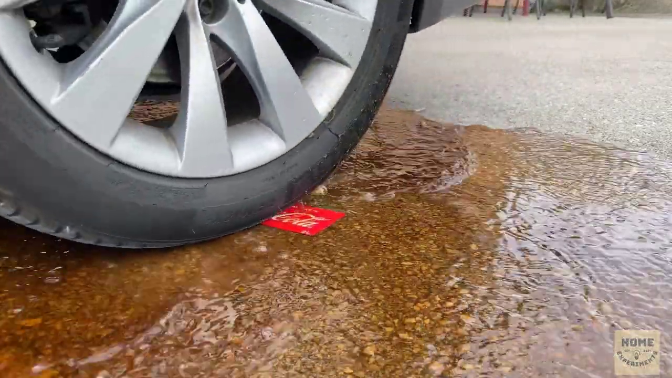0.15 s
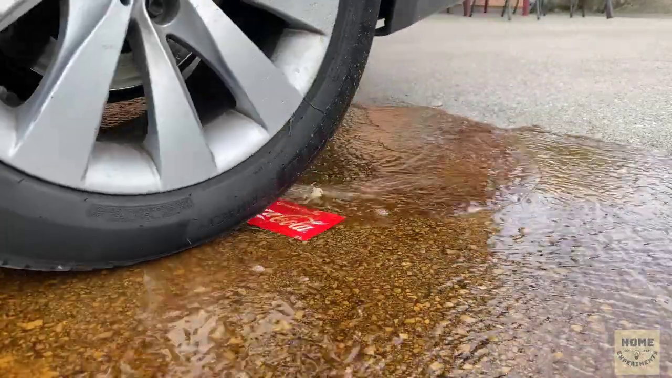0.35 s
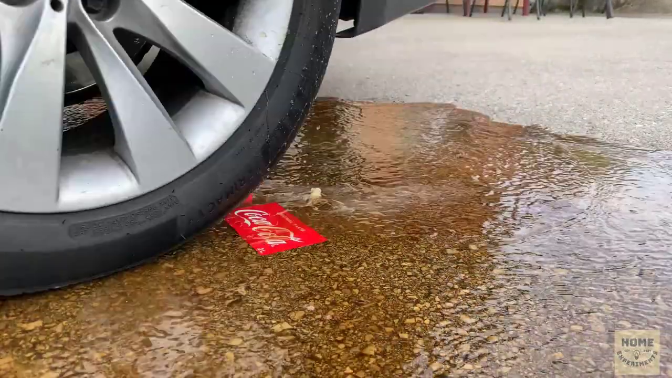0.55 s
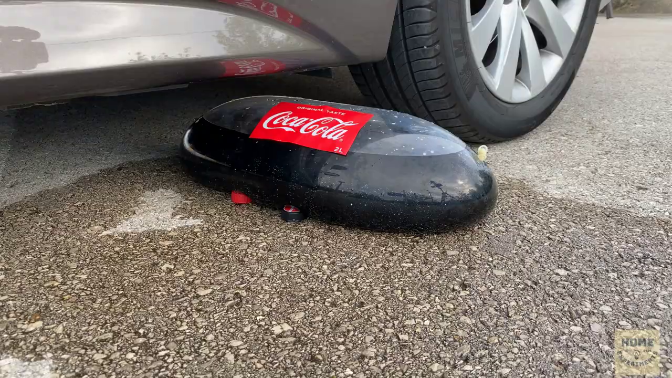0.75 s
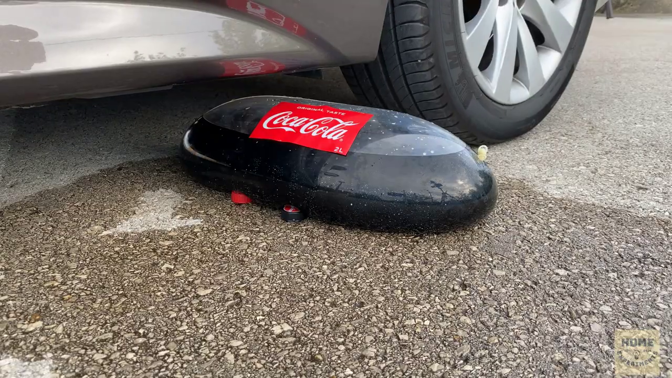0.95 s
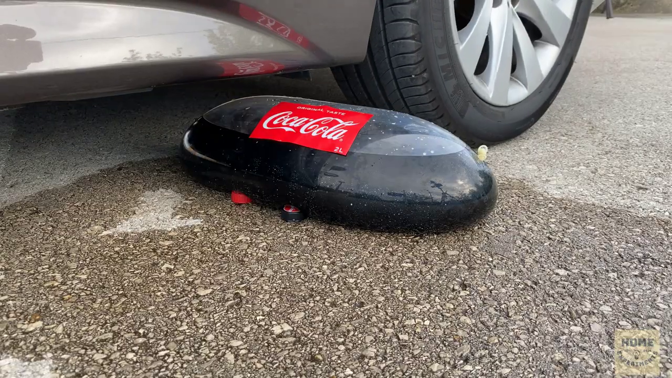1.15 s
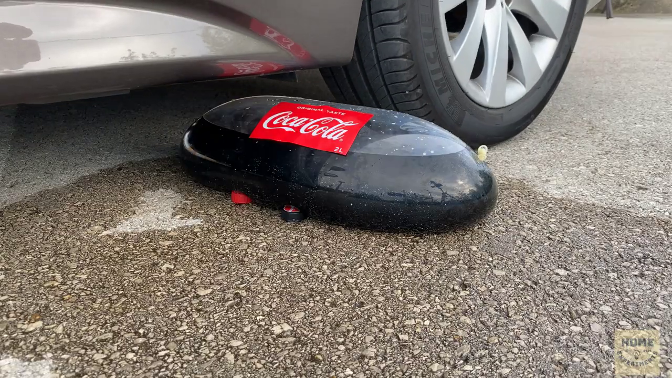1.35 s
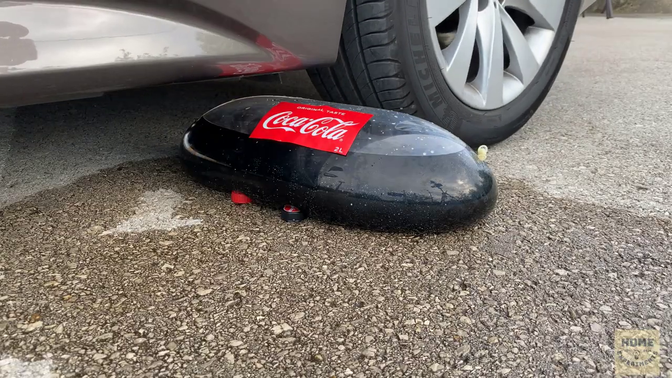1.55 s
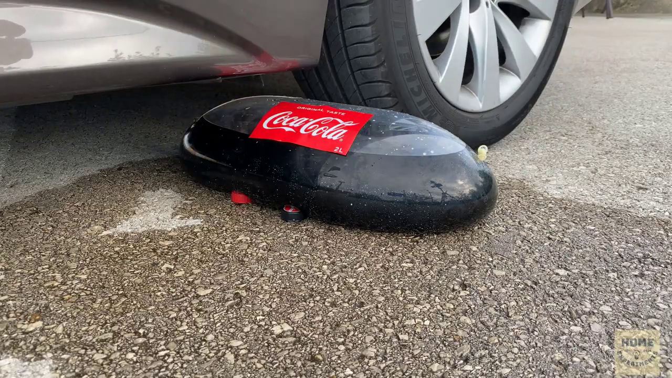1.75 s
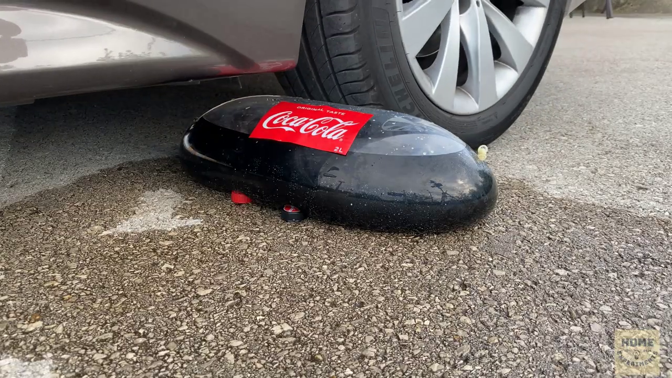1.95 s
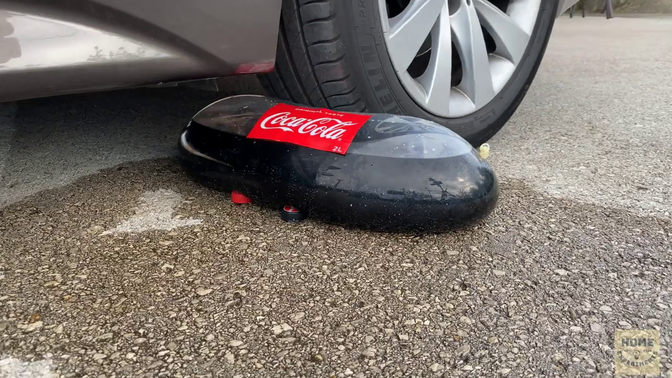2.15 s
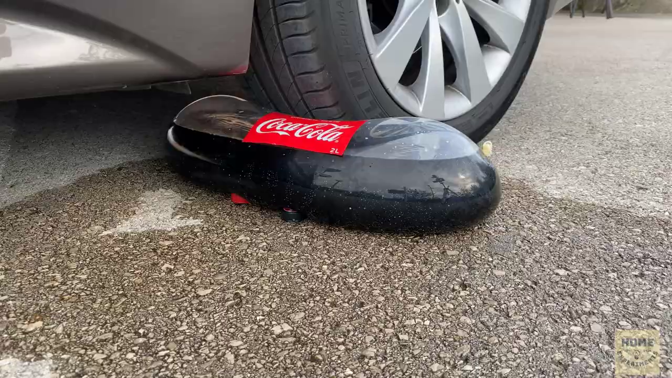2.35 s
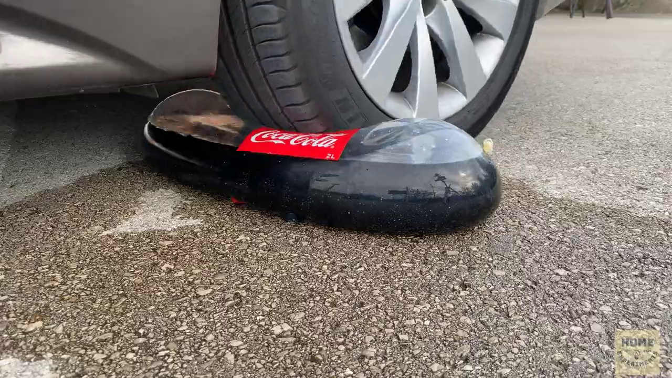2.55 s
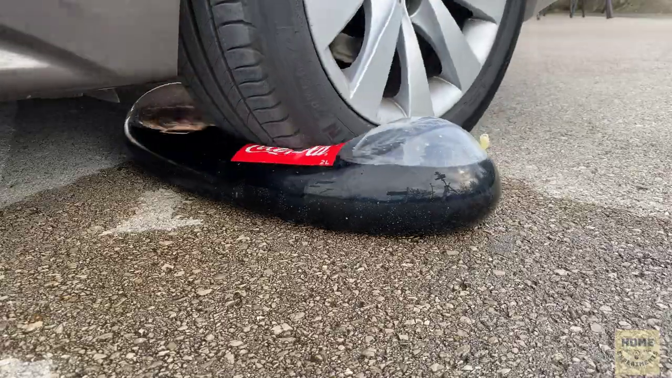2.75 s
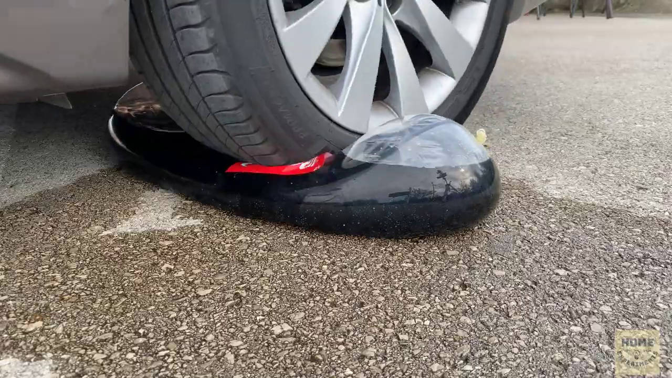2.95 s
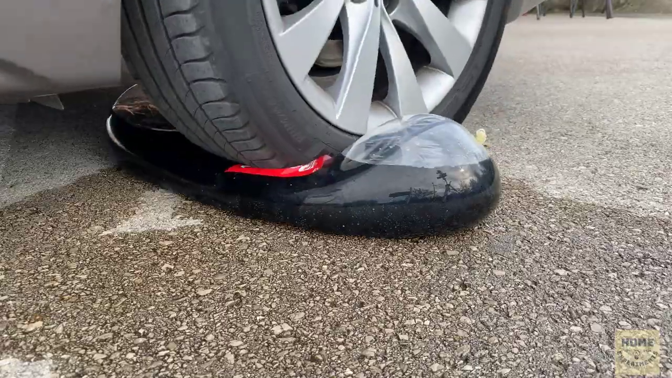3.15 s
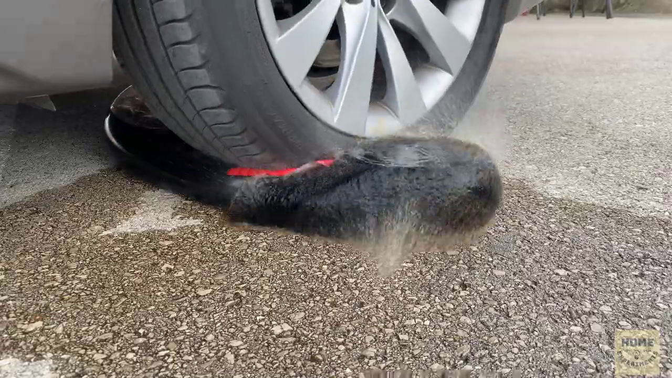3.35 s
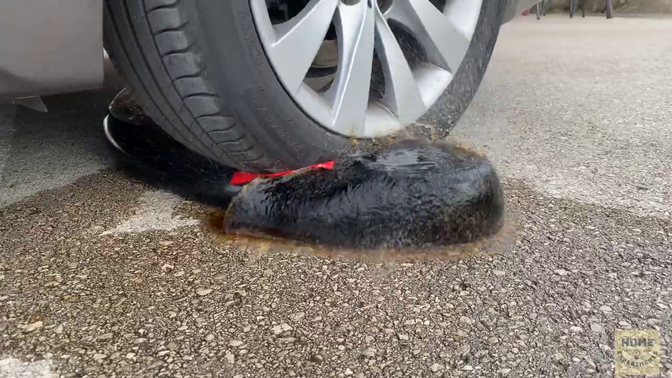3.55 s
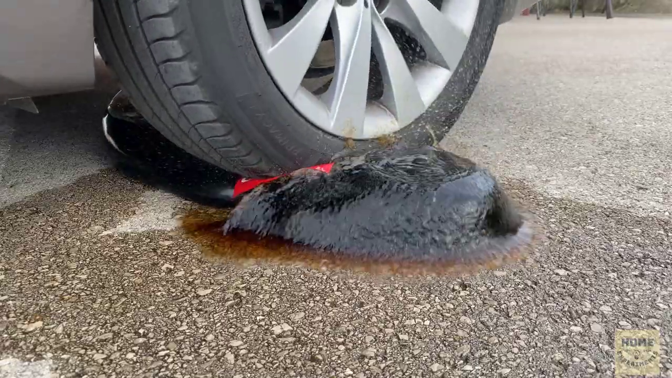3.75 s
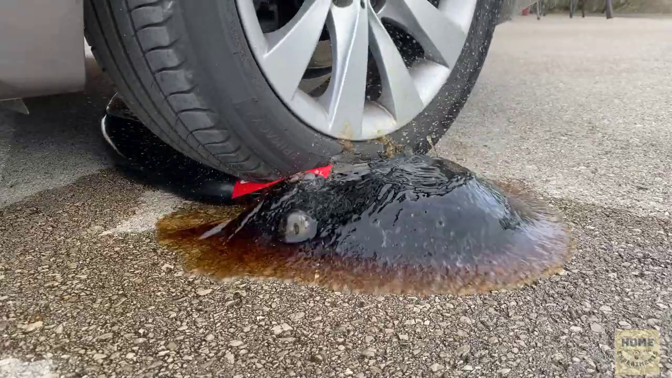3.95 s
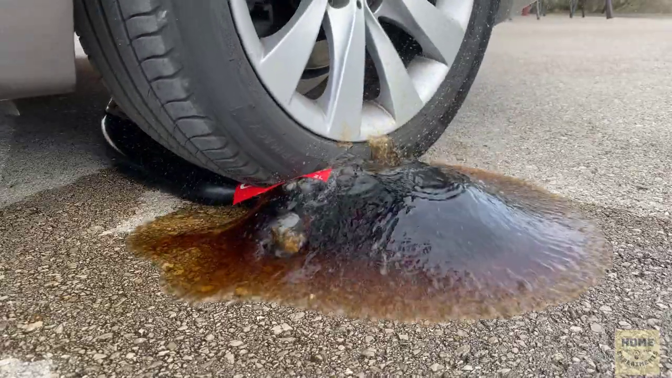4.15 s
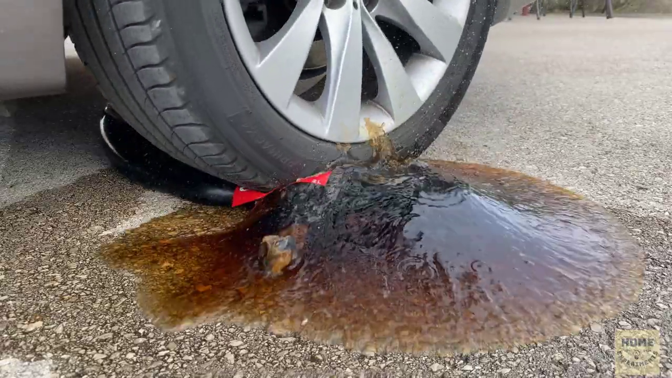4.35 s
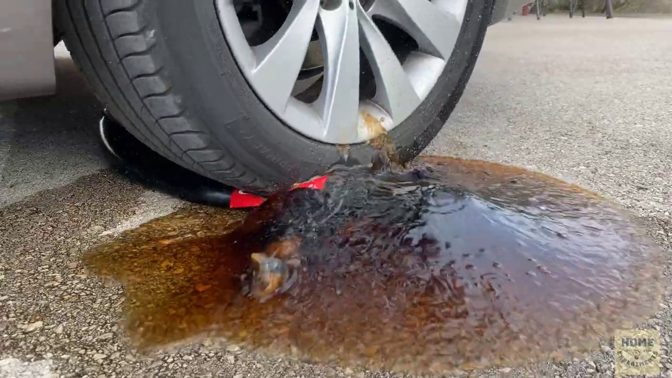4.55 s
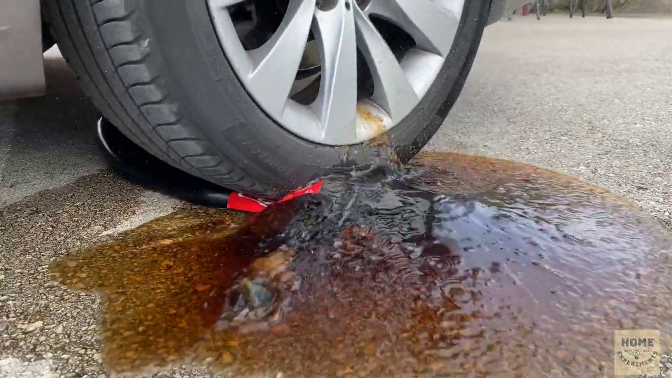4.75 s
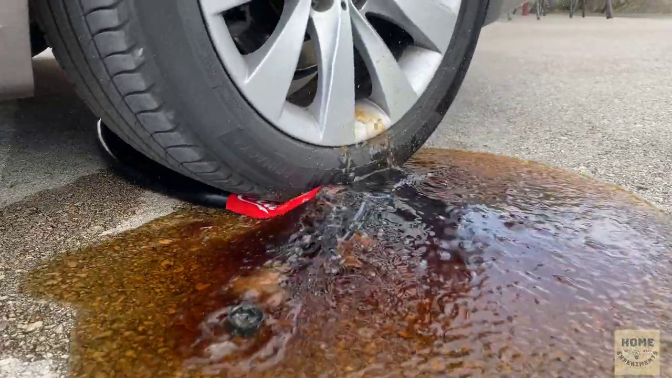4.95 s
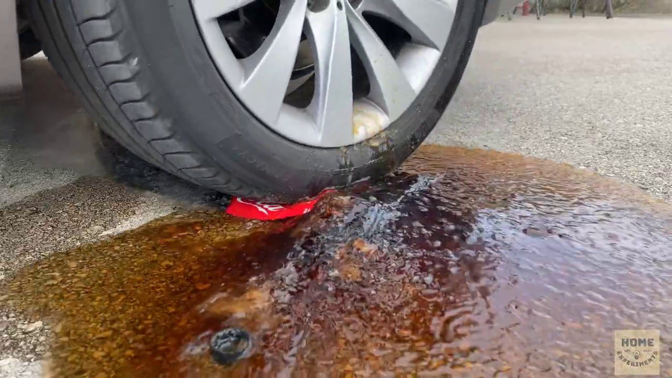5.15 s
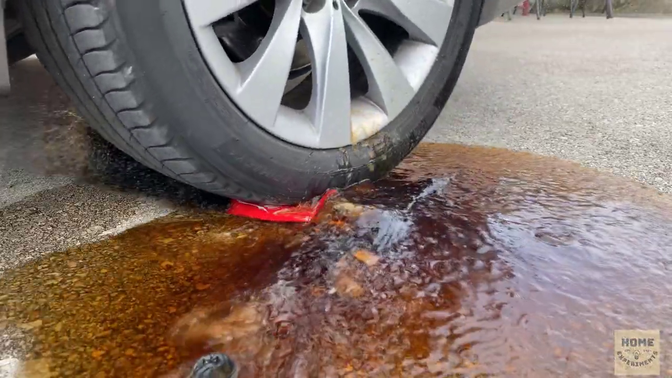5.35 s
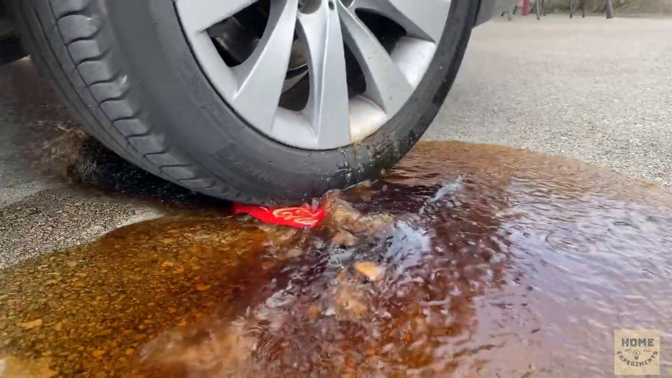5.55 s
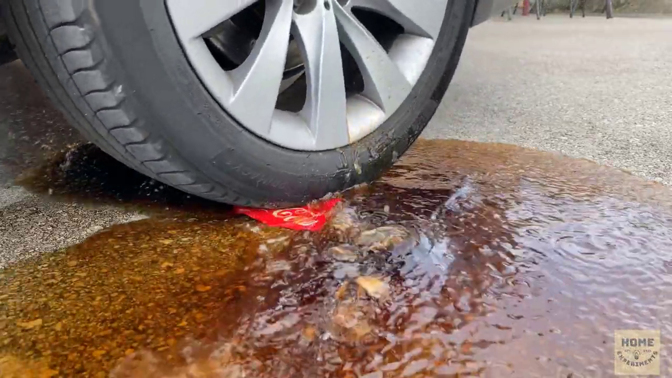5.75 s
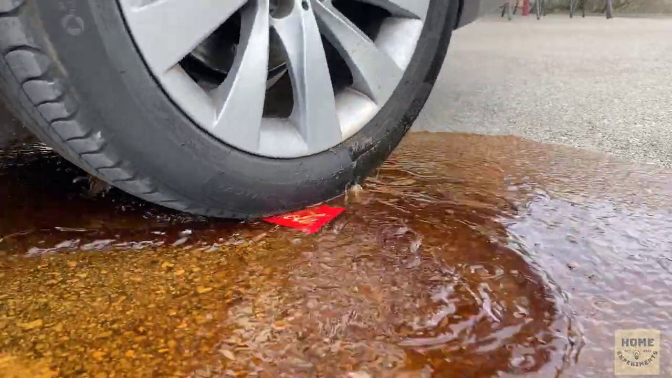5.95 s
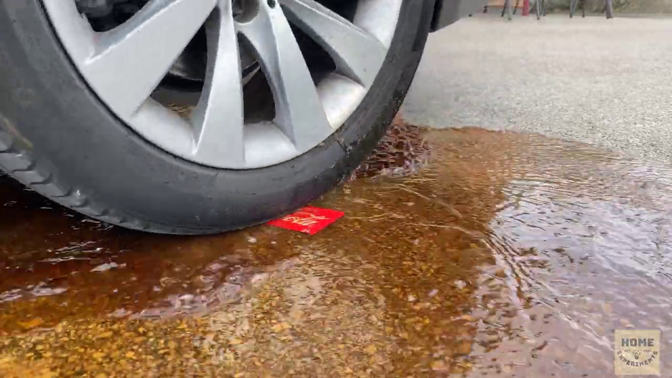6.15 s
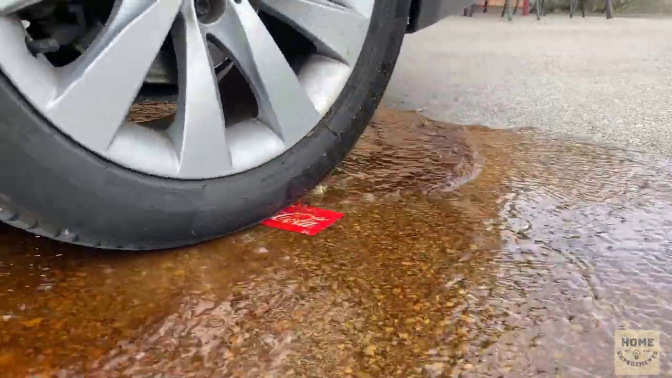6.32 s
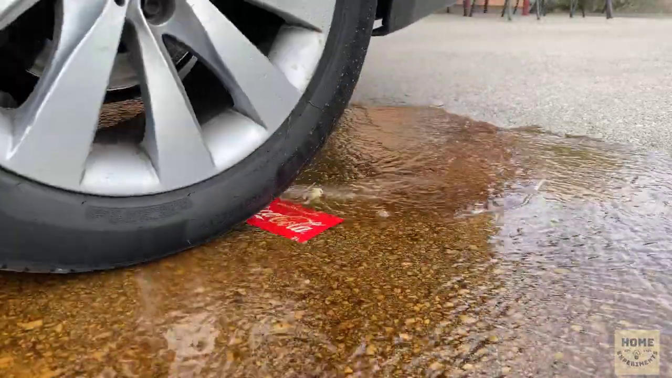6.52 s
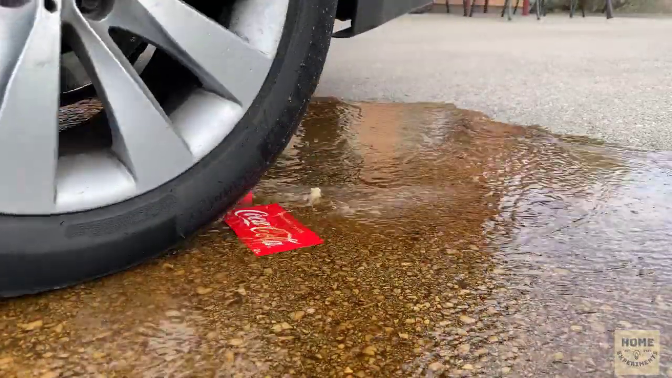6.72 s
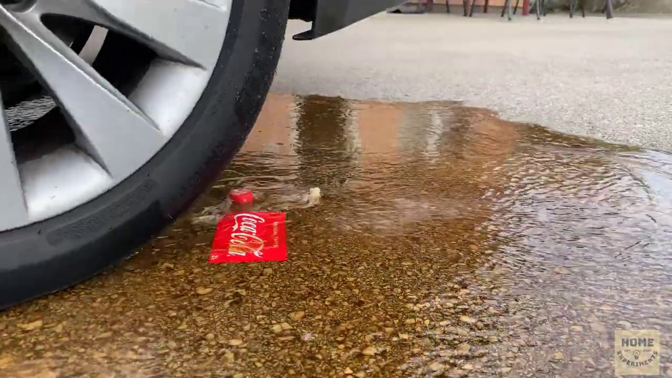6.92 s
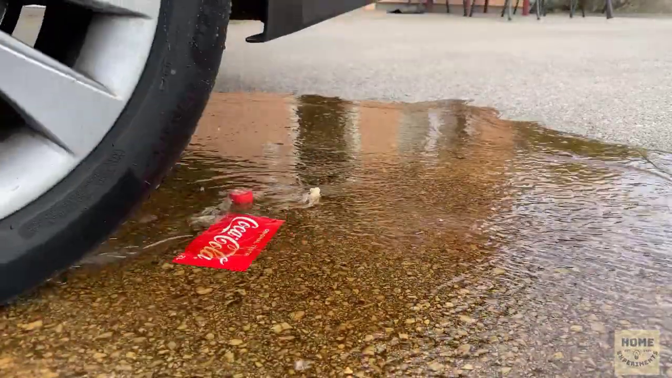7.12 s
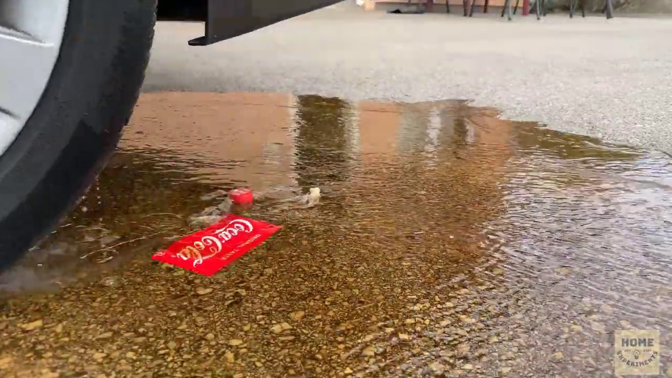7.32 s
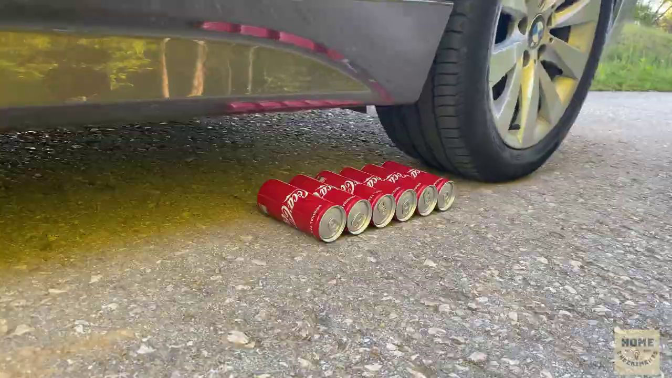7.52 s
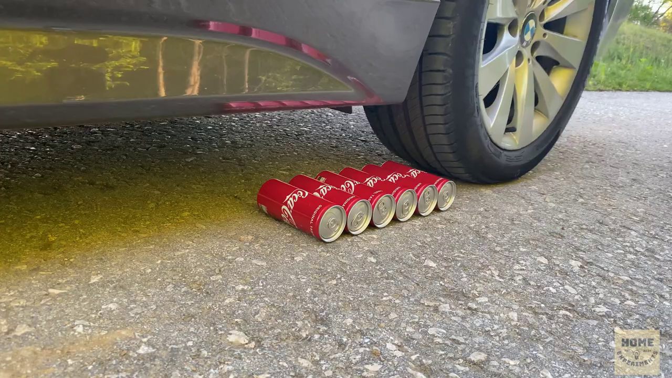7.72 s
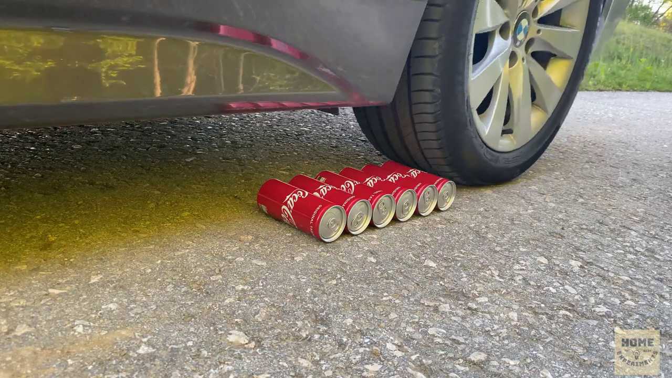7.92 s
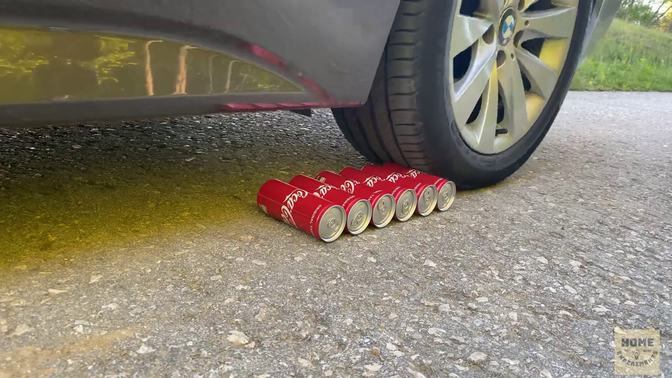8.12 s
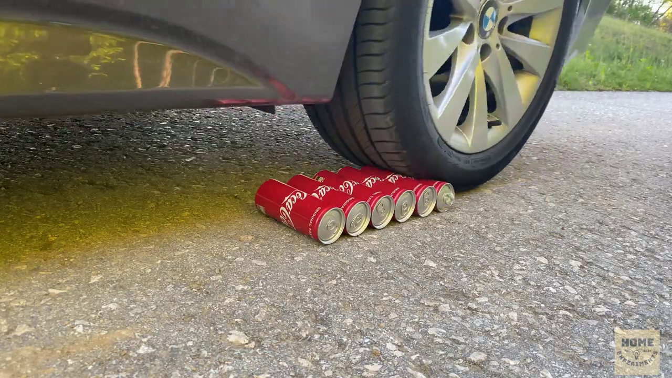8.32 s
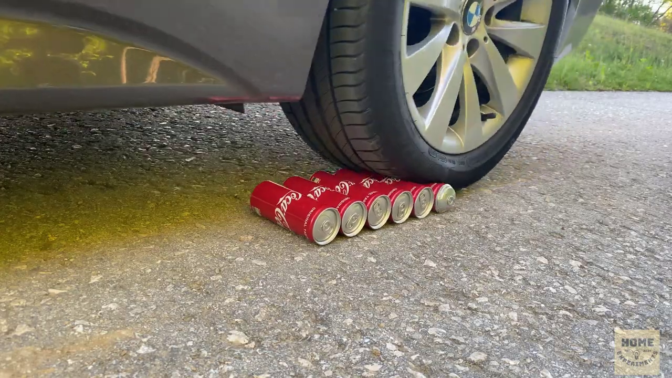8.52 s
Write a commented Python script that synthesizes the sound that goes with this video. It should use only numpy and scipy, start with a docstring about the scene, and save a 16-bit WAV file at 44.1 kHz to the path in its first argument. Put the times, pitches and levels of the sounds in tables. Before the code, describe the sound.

Close outdoor sound beside a car on rough asphalt. A tyre swishes through fizzy soda, then cuts to a quiet idle with a faint cricket. Grit crackles as a balloon is squeezed; it rips with a sharp double pop, soda gushing, glugging and fizzing away. A smaller pocket bursts later. Another cut brings throbbing engine noise and cans snapping, clacking and thudding under the tyre.

```python
"""Soda swishes and fizzes briefly; then, after hard cuts, come two more scenes close to the tyre. In the second
a balloon full of soda pops and gushes, and a last pocket bursts; in the third cans buckle. Liquid is coloured
noise with rising sine bubbles; the balloon skin is noise bursts and a slowing gas wave. Cans are flurries of
noise with decaying modes, thuds and a drone. The idling engine is throbbing noise with thin whines, and a far
cricket is a pulsed tone."""
import sys
import numpy as np
from scipy import signal
from scipy.fft import rfft, irfft
from scipy.io import wavfile
from scipy.ndimage import uniform_filter1d

SR = 44100
rng = np.random.default_rng(int(sys.argv[2]) if len(sys.argv) > 2 else 0)


def master_out(mix):
    """Clip the mix to full scale and print it as 16-bit PCM to the path in sys.argv[1]."""
    frames = np.transpose(np.atleast_2d(mix))
    ceiling = np.clip(frames, -1, 1)
    pcm = np.round(ceiling * 32767).astype(np.int16)
    wavfile.write(sys.argv[1], SR, pcm)


N = 382788
TIME = np.arange(N) / SR

# How hard the tread squeezes the balloon against wet grit. Each row: time in seconds, level in dB.
SQUEEZE_LEVEL = [(1.9, -100), (2.08, -71), (2.5, -69), (2.7, -60.5), (3.0, -70), (3.4, -74)]
# Pockets of soda giving way. Each row: first leak in seconds, fully open in seconds, spray level in dB,
# churn level in dB, drain time in seconds (scaled by the life of each part of the flow).
POCKETS = [(3.051, 3.371, -38.5, -34.5, 0.27), (5.885, 5.89, -39, -43.5, 0.2202)]


def balloon():
    """Rupture: the skin rips in noise bursts, and the freed gas swings in a wave that slows."""
    # Balloon skin ripping. Each row: start in seconds, level in dB, swell time constant in seconds,
    # decay time constant in seconds, share of deep air puff from 0 to 1.
    rips = [(3.095, -9.5, 0.000644, 0.00164, 0.02), (3.098, -27, 0.00049, 0.0107, 0.26),
            (3.1044, -20.5, 0.00037, 0.001, 0.02), (3.378, -9.5, 0.006, 0.00804, 0.76)]
    # Colour of the skin. Each row: frequency in Hz, relative density in dB per Hz.
    skin_spectrum = [(300, 5), (1500, -2.5), (4200, 3), (7000, -5), (10500, -1), (14000, -10.5),
                     (16000, -10)]
    # Colour of the air puff. Each row: frequency in Hz, relative density in dB per Hz.
    puff_spectrum = [(60, -23), (110, -2), (200, 0.5), (700, -1), (1100, -13.5), (1800, -6.5),
                     (3000, -63.5), (8000, -37.5)]
    skin = amp(2) * colour(white(0.066), skin_spectrum)
    puff = colour(white(0.592), puff_spectrum)
    out = np.zeros((2, N))
    for s, db, swell, decay, deep in rips:
        deep = np.clip(deep, 0, 1)
        envelope = np.exp(np.minimum((TIME - s) / swell, (s - TIME) / decay))
        out += amp(db) * envelope * (np.sqrt(1 - deep) * skin + np.sqrt(deep) * puff)
    t, gas = np.arange(SR // 10) / SR, np.zeros(N)
    hz = 85 + 380 * np.exp(-t / 0.00263)  # slows as the opening grows
    envelope = (1 - np.exp(-t / 0.00082)) * np.exp(-t / 0.0052)
    add(gas, 3.0966, -amp(-3.5) * np.sin(2 * np.pi * np.cumsum(hz) / SR) * envelope)
    return underbody(out + gas, wet_db=-18.0, t60=0.132)


def gush():
    """Turbulent outflow: soda churns out and spreads in spray, droplets, small bubbles and foam."""
    # Soda gushing out. Each row: frequency in Hz, relative density in dB per Hz.
    spray_spectrum = [(60, 4.5), (200, -7.5), (600, -2), (1100, 6.5), (1800, -10), (3800, 4.5),
                      (6000, -5.5), (10000, -11), (16000, -48.5)]
    # Bulk of the liquid churning at the tear. Each row: frequency in Hz, relative density in dB per Hz.
    churn_spectrum = [(60, 2), (130, 0), (220, -13), (330, -8), (550, -10), (850, -13.5), (1500, -20.5)]
    # Fine hiss over the wet ground. Each row: frequency in Hz, relative density in dB per Hz.
    hiss_spectrum = [(3000, -3.5), (5500, 0.5), (8000, 0), (10000, 1.5), (14500, -6), (16000, -2.5)]
    churn_flow = outflow(rise=6.14, life=0.391, fall=3.6, column=3)
    spray_flow = outflow(rise=1.89, life=1.15, fall=2.198)
    foam_flow = outflow(rise=4, life=2.156, fall=1.025)

    lumps = amp(2 * wander(90))
    churn = colour(white(0.997), churn_spectrum) * churn_flow * lumps
    spray = clumps(white(.4) + amp(1) * droplets(rate=2000, spread_db=3.8), patchy_db=2.2)
    spray = colour(spray, spray_spectrum) * amp(-0.49 + 1.4 * wander(70))
    # small bubbles start just before each pocket opens
    bubbles = sum(gurgle(opens - .1, opens + .9, count=56, low_hz=559.6, high_hz=2308, spread_db=8.5)
                  for _, opens, *_ in POCKETS)
    splash = (spray + amp(-3.0) * bubbles) * spray_flow
    foam = white(0.74) + amp(-7.5) * droplets(rate=760, spread_db=9.5)
    foam_level = amp(-10.5) * foam_flow + amp(1) * level(SQUEEZE_LEVEL)
    return churn + splash + colour(foam, hiss_spectrum) * foam_level


def outflow(rise, life, fall, column=2):
    """Draining: gain over time as each pocket leaks more and more, opens, and drains ever more slowly.

    rise and fall are exponents of steepness; life counts drain times."""
    power = np.zeros(N)
    for row in POCKETS:
        leak, tear, drain = row[0], row[1], row[4]
        opening = np.clip((TIME - leak) / max(tear - leak, 1e-3), 0, 1) ** rise
        draining = 1 + (np.maximum(TIME - tear, 0) / (life * drain)) ** fall
        power += (amp(row[column]) * opening / draining) ** 2
    return np.sqrt(power)


def glugs():
    """Bubble resonance: large bubbles and gulping pockets, roughened by the churning liquid."""
    # Largest single bubbles. Each row: start in seconds, level in dB, starting pitch in Hz.
    large_bubbles = [(.462, -40, 372), (3.305, -39, 487.7), (3.351, -29.5, 699), (3.455, -32.5, 129),
                     (3.505, -37, 289), (3.581, -37, 986), (3.64, -37.5, 1069), (3.67, -41, 511),
                     (3.774, -44.5, 777), (3.899, -40.5, 1055), (5.886, -30.5, 117.5),
                     (5.888, -37.5, 620.2), (6.015, -36.5, 997), (6.075, -38, 1083), (6.102, -42.5, 546.5),
                     (6.208, -45.5, 750), (6.333, -41, 1097)]
    # Collapsing air pockets. Each row: start in seconds, level in dB, start pitch in Hz,
    # end pitch in Hz, length in seconds.
    collapses = [(3.201, -49.5, 438, 1047, 0.039), (3.432, -40, 418.3, 995, 0.055),
                 (3.513, -33.5, 379.6, 1352, .036), (5.931, -33.5, 252.6, 1351, .054)]
    out = np.zeros(N)
    for s, db, hz in large_bubbles:
        add(out, s, amp(db) * bubble(hz))
    for s, db, start_hz, end_hz, length in collapses:
        add(out, s, amp(db) * gulp(start_hz, end_hz, length))
    rough = 1 + 0.316 * wander(450)
    return amp(-1.0) * underbody(out * rough, wet_db=-9.5, t60=0.0756)


def gulp(start_hz, end_hz, length):
    """Cavity collapse: a pocket of air shrinks faster and faster; its ring climbs, swells and stops."""
    bend, swell, overtone_db = 1.35, 1.69, -6  # exponents above 1: pitch and level climb late
    u = np.arange(0, 1, 1 / (length * SR))
    hz = start_hz * (end_hz / start_hz) ** (u ** bend)
    phase = 2 * np.pi * np.cumsum(hz) / SR
    ring = np.sin(phase) + amp(overtone_db) * u * np.sin(2 * phase)
    return ring * np.sqrt(np.sin(np.pi * u ** swell))


def bubble(hz):
    """Bubble resonance: one bubble rings briefly and rises in pitch as it nears the surface."""
    rise = 1.245  # end pitch over start pitch
    length = min(12.58 / hz, 0.036)  # seconds; the biggest break up early
    return swoop(hz, hz * rise, length, splash_db=-8)


def gurgle(start, end, count, low_hz=600, high_hz=2000, spread_db=7):
    """Random superposition: small bubbles of random size, scattered over a stretch of time."""
    out = np.zeros(N)
    for k, (when, pitch, size) in enumerate(rng.random((count, 3))):
        s = start + (end - start) * (k + when) / count
        hz = low_hz * (high_hz / low_hz) ** pitch
        add(out, s, amp(spread_db * (size - .5)) * bubble(hz))
    return out


def droplets(rate, spread_db, count=28):
    """Bubble statistics: countless tiny bubbles, each a few rising cycles; a few are large."""
    out = np.zeros(N)
    for hz in np.geomspace(700, 13000, count):
        t = np.arange(0, 24 / hz, 1 / SR)
        ping = np.sin(2 * np.pi * hz * t * (1 + .005 * hz * t)) * np.exp(-hz * t / 4)
        size = amp(spread_db * np.minimum(rng.exponential(1, N), 4))
        train = size * (rng.random(N) < rate / count / SR * np.sqrt(hz / 3000))
        out += signal.oaconvolve(train, ping)[:N] * (hz / 3000) ** .75
    return unit(out)


def clumps(x, patchy_db, size=9):
    """Intermittency: splashing comes in random clumps, each brief and confined to one band."""
    z = signal.stft(x, nperseg=256)[2]
    patches = uniform_filter1d(rng.standard_normal(z.shape[1:]), size, axis=0)
    patches = uniform_filter1d(patches, size=5, axis=1)
    patchy = z * amp(patchy_db * unit(patches))
    return unit(signal.istft(patchy, nperseg=256)[1][:, :N])


def cans():
    """Shell buckling: each buckle is a flurry of creases with a short rattle; the wall modes ring on."""
    # Can walls buckling, short rows a single snap, long ones a creak or crumple.
    # Each row: start in seconds, length in seconds, crack level in dB, hollow clack level in dB.
    snaps = [(8.062, 0.0041, -43.5, -32), (8.07, 0.18, -55.5, -41.5), (8.186, 0.00284, -29.5, -25.5),
             (8.214, 0.00656, -18.5, -37), (8.2217, 0.00294, -13, -44), (8.235, .045, -22, -38.5),
             (8.244, 0.0027, -17.5, -45), (8.2533, 0.00396, -12.5, -39.5), (8.2614, 0.00437, -8.5, -24),
             (8.2766, 0.00404, -9.5, -9), (8.313, 0.00269, -11, -25), (8.3989, 0.00386, -6.5, -5.5),
             (8.4602, 0.00468, -16, -10.5), (8.5133, 0.0217, -24, -34.5), (8.5717, 0.0066, -25.5, -48),
             (8.612, 0.02324, -22.5, -17), (8.6495, 0.007, -24, -11), (8.67, 0.0063, -26.5, -39.5)]
    # Low hollow colour of a snap. Each row: frequency in Hz, relative density in dB per Hz.
    clack_spectrum = [(60, -25), (250, 4.5), (480, -3), (750, 3.5), (1100, -3.5), (1500, -1), (2200, -8),
                      (4000, -34.5)]
    # Middle colour of a snap. Each row: frequency in Hz, relative density in dB per Hz.
    crack_spectrum = [(900, -13), (1700, -11), (2500, -4), (3300, -1), (4200, -5.5), (5500, -22),
                      (9000, -46.5)]
    # High sizzle of a snap. Each row: frequency in Hz, relative density in dB per Hz.
    treble_spectrum = [(2500, -7.5), (5000, 0.5), (8000, 0.5), (11000, -6), (14500, -7.5), (16000, -14)]
    # Can wall modes. Each row: frequency in Hz, relative level in dB, 60 dB decay time in seconds.
    wall_modes = [(1213, 0.5, 0.224), (1510, -5.5, 0.133), (1968, 3.5, 0.098), (2164, 5, 0.106),
                  (2462.6, 12, 0.0644), (2776, -9, 0.086), (2810, 5, 0.098), (3000, 5.5, 0.098),
                  (3590, -10, .06), (3680, -10, 0.112)]
    treble_db, rattle_db, rattle_s = -5.5, -9.5, 0.0111  # sizzle above each crack; the rattle after it
    # a buckle of crumple_s or longer breaks up fully into separate creases
    crumple_db, creases_per_s, crumple_s = 3.5, 330, 0.045

    out, t = np.zeros(N), np.arange(SR // 4) / SR
    for s, length, crack_db, clack_db in [*snaps, *crinkles()]:
        uneven = np.interp(t * creases_per_s, np.arange(256), rng.standard_normal(256))
        breakup = amp(crumple_db * min(length / crumple_s, 1) * uneven)
        flurry = np.exp(-(t / length) ** 3) * breakup + amp(rattle_db) * np.exp(-t / rattle_s)
        tones = ((clack_db, clack_spectrum), (crack_db, crack_spectrum),
                 (crack_db + treble_db, treble_spectrum))
        creases = sum(amp(db) * colour(rng.standard_normal(len(t)), tone) for db, tone in tones)
        # the wall changes shape with every dent
        detune = 1 + 0.01557 * rng.standard_normal(len(wall_modes))
        ring = sum(amp(db - 60 * t / t60) * np.sin(2 * np.pi * hz * d * t)
                   for (hz, db, t60), d in zip(wall_modes, detune))
        onset = 1 - np.exp(-t / 0.00043)
        add(out, s, (amp(-3.0) * creases * flurry + amp(crack_db - 23) * ring) * onset)
    return out


def crinkles(count=7):
    """Random small buckling while the flattened cans lie under the tread, as rows like the snaps."""
    start, end, crack_db = 8.42, 8.66, -35.5
    return [(start + (end - start) * (k + when) / count, .002, crack_db + 6 * (size - .5), crack_db - 1.5)
            for k, (when, size) in enumerate(rng.random((count, 2)))]


def tyre():
    """Impact and cavity resonance: cans thump against the tyre, and each thump sets its air droning."""
    # Cans knocked between tread and road. Each row: start in seconds, level in dB, pitch in Hz,
    # 60 dB decay time in seconds of the drone it starts.
    thuds = [(8.03, -23, 139.7, 0.75), (8.088, -13, 239.3, 0.478), (8.275, -14.5, 225.3, 0.227),
             (8.399, -19, 234, 1), (8.459, -15, 257, 0.705), (8.555, -25.5, 295, .4),
             (8.611, -19.5, 211.3, 0.57)]
    # Modes of the loaded tyre and cans. Each row: frequency in Hz, width in Hz, relative level in dB.
    drone_modes = [(229.2, 20.6, -2), (435.2, 20, -13), (139, 55, -10.5), (324.3, 59, -7), (756, 216, -30)]
    thud_cycles, drone_db, drone_rise_s = 3.09, -16, 0.0068
    out, power, t = np.zeros(N), np.zeros(N), np.arange(SR) / SR
    for s, db, hz, t60 in thuds:
        add(out, s, amp(db) * swoop(hz, hz, thud_cycles / hz, splash_db=-15))
        drone = amp(db + drone_db - 60 * t / t60) * (1 - np.exp(-t / drone_rise_s))
        add(power, s, drone ** 2)
    # the first can scrapes on the road
    add(out, 7.943, amp(-38.5) * swoop(599.5, 445.5, 0.046, splash_db=-4))
    return out + resonances(white(), drone_modes) * np.sqrt(power)


def opening_swish():
    """Turbulence and bubble resonance: soda swishes and fizzes in a short opening stretch."""
    # Swishing soda. Each row: frequency in Hz, relative density in dB per Hz.
    swish_spectrum = [(24, -66), (40, -22), (140, -9), (312, -11), (392, -4.5), (542, -8.5), (615, -0.5),
                      (810, -16.5), (918, -5), (1210, -13), (3220, -5), (12800, -23.5), (16000, -25)]
    # The swish dies away. Each row: time in seconds, level in dB.
    swish_level = [(0, -42.5), (.45, -47.5), (.77, -51)]
    wet = clumps(white() + amp(-1) * droplets(rate=1500, spread_db=4), patchy_db=1.2)
    swish = colour(wet, swish_spectrum) * amp(0.23 + 0.91 * wander(58.48))
    return (swish + amp(-10.5) * gurgle(0, .8, count=24)) * level(swish_level)


def grit(rate=380, spread_db=4.5):
    """Random impulses: wet grit crackles as the tread presses the balloon against the road."""
    # Colour of the crackle. Each row is a frequency in Hz and a relative density in dB per Hz.
    crackle = colour(white(), [(1500, -36.5), (4000, 4), (9000, -2), (15500, -4)])
    size = amp(spread_db * np.minimum(rng.exponential(1, N), 3)) * (rng.random(N) < rate / SR)
    decay_s = 0.00256
    bursts = signal.lfilter([1], [1, -np.exp(-1 / (decay_s * SR))], size)
    return unit(crackle * bursts) * level(SQUEEZE_LEVEL)


def ticks(stone_db=-54.5, stone_hz=1700, count=11):
    """Damped impacts: broad snaps under the tread; faint stones shift as the tyre nears the balloon."""
    # Loudest snaps of grit, rubber and drops. Each row: start in seconds, level in dB, centre in Hz.
    loud_snaps = [(.0585, -23, 1010), (.422, -25.5, 2600), (1.111, -49.5, 1660), (1.435, -48.5, 1770),
                  (1.583, -52.5, 1840), (1.775, -52, 8950), (2.334, -46, 6000), (2.621, -44.5, 1000),
                  (2.709, -39, 1090), (2.942, -30.5, 8800), (3.682, -27.5, 3816), (4.939, -40, 3620),
                  (5.968, -25.5, 3800), (6.114, -28.5, 3700)]
    out, t = np.zeros(N), np.arange(SR // 20) / SR
    stones = [(1.5 + 1.2 * (k + when) / count, stone_db + 3 * (size - .5), stone_hz * 2 ** (pitch - .5))
              for k, (when, size, pitch) in enumerate(rng.random((count, 3)))]
    for s, db, hz in [*loud_snaps, *stones]:
        tuning = [(hz / 5, -15), (hz, 0), (hz * 1.45, -8), (hz * 4, -15)]
        grain = colour(rng.standard_normal(len(t)), tuning)
        add(out, s, amp(db) * grain / 2 * np.exp(-t / .003))
    return underbody(out, wet_db=-25.5, t60=0.0455)


def near_car():
    """Amplitude modulation: the throbbing engine noise of the car beside the cans."""
    # Colour of the car. Each row: frequency in Hz, relative density in dB per Hz.
    car_spectrum = [(18, -80), (30, -27), (87, 1), (167, -5), (247, -2.5), (312, -4.5), (581, -4),
                    (1030, -8), (1560, -8.5), (1690, -5.5), (1830, -8.5), (4310, -8), (4900, -15.5),
                    (6880, -20), (15000, -37.5)]
    # Course of its loudness. Each row: time in seconds, level in dB.
    car_level = [(7.45, -50), (7.6, -48.5), (8.0, -49), (8.17, -43), (8.36, -47.5), (8.68, -34.5)]
    return clatter(colour(white(), car_spectrum), depth=0.118)[0] * level(car_level)


def idle():
    """Filtered noise and resonance: exhaust rumble, engine-bay whirr and thin whines; one whine sags."""
    # Exhaust rumble. Each row: frequency in Hz, relative density in dB per Hz.
    rumble_spectrum = [(25, -50.5), (51, 0), (75, 3), (101, -2), (150, -8), (220, -12), (400, -20),
                       (700, -36)]
    # The exhaust swells with each push on the throttle. Each row: time in seconds, level in dB.
    throttle_level = [(.8, -73.5), (1.3, -65), (2.3, -63), (3.8, -65), (4.8, -59), (5.5, -59.5), (6.3, -64),
                      (7.3, -56.5)]
    # Engine-bay whirr. Each row: frequency in Hz, relative density in dB per Hz.
    whirr_spectrum = [(200, -3.5), (400, 8.5), (620, 7.5), (780, 0), (1200, -2), (1700, 0.5), (2300, -0.5),
                      (2700, -3), (3400, 0.5), (4800, 2), (6000, -13.5), (8000, -8.5), (12000, -37.5)]
    # The engine comes nearer, then stays. Each row: time in seconds, level in dB.
    engine_level = [(.8, -72.5), (1.9, -68), (2.7, -61), (4.2, -56.5), (7.45, -56)]
    # Thin engine whines. Each row: frequency in Hz, width in Hz, level in dB.
    whine_modes = [(473.5, 82, -70.5), (566.5, 69, -77.5), (898.5, 27, -72.5), (2265, 130, -76),
                   (3290, 510, -80)]
    rumble = colour(white(0.963), rumble_spectrum) * level(throttle_level) * amp(1.31 + 3.24 * wander(9))
    load = level(engine_level)
    whirr = clatter(colour(white(0.505), whirr_spectrum), depth=0.289) * load
    # the whines follow the engine's load
    whines = resonances(white(0.73), whine_modes) * unit(load) * amp(0.53 * wander(7.2))
    sagging = np.zeros(N)
    add(sagging, 1.64, amp(-67.0) * swoop(660, 570, 0.353, splash_db=-16.5))
    return rumble + whirr + whines + sagging


def clatter(x, depth, firing_hz=28):
    """Amplitude modulation: engine noise throbs with the firings and rings in many cavity modes."""
    hz = firing_hz * (1 + 0.0291 * wander(2.8))
    throb = 1 + depth * np.cos(2 * np.pi * np.cumsum(hz) / SR)
    return unit(underbody(x * throb, wet_db=-4, t60=.09))


def cricket(pitch_hz=4750, syllable_hz=26, chirp_period_s=.31):
    """Stridulation: a far cricket's wing strokes swell into chirps, each stroke falling in pitch."""
    stroke = (TIME * syllable_hz) % 1
    chirp = .6 + .4 * np.cos(2 * np.pi * (TIME - .88) / chirp_period_s)
    hz = pitch_hz * (1 + .05 * (.5 - stroke) + .016 * wander(500))
    song = np.sin(2 * np.pi * np.cumsum(hz) / SR) * np.sin(np.pi * stroke) ** 4 * chirp
    return amp(-63) * underbody(song, wet_db=-4, t60=.25)


def underbody(x, wet_db, t60):
    """Reverberation: dense, short echoes between the road and the floor of the car."""
    t = np.arange(SR // 3) / SR
    sparse = rng.standard_normal((2, len(t))) * (rng.random(len(t)) < .1)
    taps = sparse * (t > .003) * amp(-60 * t / t60)
    taps = signal.lfilter([.5], [1, -.5], taps)  # dulls the echoes
    taps /= np.linalg.norm(taps, axis=1, keepdims=True)
    stereo = np.atleast_2d(x) * np.ones((2, 1))
    return x + amp(wet_db) * signal.oaconvolve(stereo, taps, axes=1)[:, :N]


def ports(x):
    """Phase difference: the right microphone port trails the left by a lag set for each frequency."""
    # Lag of the right port. Each row: frequency in Hz, phase in radians.
    port_lag = [(0, 0), (800, 1.8), (2000, 4.4), (4400, 9.5), (7400, 17.3), (8100, 15.7), (9200, 13.8),
                (12100, 9.4), (14400, 6.2), (16000, 2.6)]
    lag = np.interp(np.fft.rfftfreq(N, 1 / SR), *np.transpose(port_lag))
    return np.array([x[0], irfft(rfft(x[1]) * np.exp(-1j * lag), N)])


def swoop(start_hz, end_hz, length, splash_db):
    """Gliding resonance: a short ring swells fast and fades, in a broad puff of noise round its pitch."""
    u = np.arange(0, 2, 1 / (length * SR))  # the pitch glides until u = 1, then holds
    hz = start_hz * (end_hz / start_hz) ** np.minimum(u, 1)
    centre = np.sqrt(start_hz * end_hz)
    tuning = [(centre / 3, -13), (centre, 0), (centre * 2, -10), (centre * 5, -22)]
    splash = colour(rng.standard_normal(len(u)), tuning)
    envelope = u / .33 * np.exp(.5 - .5 * (u / .33) ** 2)
    return (np.sin(2 * np.pi * np.cumsum(hz) / SR) + amp(splash_db) * splash) * envelope


def resonances(x, modes):
    """Resonance: noise through steep, narrow peaks, each given by frequency, width and level."""
    f, z = np.fft.rfftfreq(N, 1 / SR), rfft(x)
    return sum(amp(db) * unit(irfft(z / (1 + (2 * (f - hz) / width) ** 2), N)) for hz, width, db in modes)


def colour(x, points):
    """Spectral shaping: filters by a curve of Hz and dB, to rms 1."""
    hz, db = np.transpose(points)
    f = np.fft.rfftfreq(x.shape[-1], 1 / SR) + 1
    skirt = np.minimum(f / hz[0], 1) ** 2 * np.minimum(hz[-1] / f, 1) ** 4  # falls off outside the curve
    gain = skirt * amp(np.interp(np.log(f), np.log(hz), db))
    return unit(irfft(rfft(x) * gain, x.shape[-1]))


def white(same=1):
    """Partial coherence: stereo white noise with a given likeness between the channels."""
    a, b = rng.standard_normal((2, N))
    same = np.clip(same, 0, 1)
    return np.array([a, same * a + np.sqrt(1 - same ** 2) * b])


def wander(rate):
    """Slow fluctuation: random knots of rms 1, rate of them per second, joined by straight lines."""
    knots = rng.standard_normal(N // 20)
    return np.interp(TIME * rate, np.arange(len(knots)), knots)


def amp(db):
    """Logarithmic level: decibels to gain."""
    return 10 ** (np.asarray(db) / 20)


def unit(x):
    """Normalisation: scales to rms 1."""
    return x / np.sqrt(np.mean(x ** 2) + 1e-20)


def level(rows):
    """Envelope: gain over time from rows of seconds and dB."""
    rows = np.array(rows)
    return amp(np.interp(TIME, rows[:, 0], rows[:, 1]))


def add(mix, s, sound):
    """Superposition: mixes a sound in at time s."""
    part = mix[max(round(s * SR), 0):][:len(sound)]
    part += sound[:len(part)]


def shot(start, end):
    """Gating: one between two times in seconds, zero outside, with edges a few milliseconds long."""
    return uniform_filter1d(1. * ((TIME >= start) & (TIME < end)), size=128)


def scene():
    """Superposition: three scenes joined by hard cuts; the balloon lies a little to the left."""
    soda_and_engine = ports(idle() + gush() + cricket()) * amp([[1.7], [-1.5]])
    middle = soda_and_engine + balloon() * amp([[.5], [-.3]]) + grit()
    details = (ticks() + glugs()) * amp([[1], [-1]])
    last = near_car() + cans() + tyre()
    return opening_swish() * shot(-1, .781) + middle * shot(.8, 7.447) + last * shot(7.447, 9) + details


def record(dry):
    """Transduction: the microphone sheds the deepest bass, its input clips, and the band is limited."""
    lean = signal.sosfilt(signal.butter(2, 42, "highpass", fs=SR, output="sos"), dry)
    clipped = np.clip(lean, -1, 1)  # the loudest cracks overload
    band_limit = signal.firwin(255, 16250, window=("kaiser", 8), fs=SR)
    return signal.oaconvolve(clipped, band_limit[None], "same")


dry = scene()
out = record(dry)
master_out(out)
```